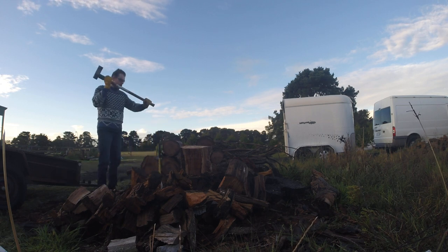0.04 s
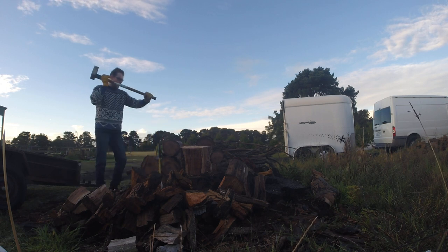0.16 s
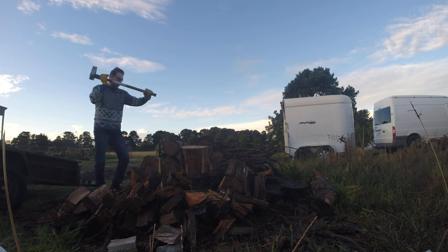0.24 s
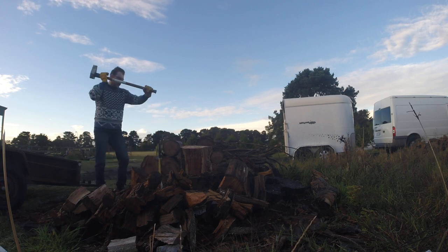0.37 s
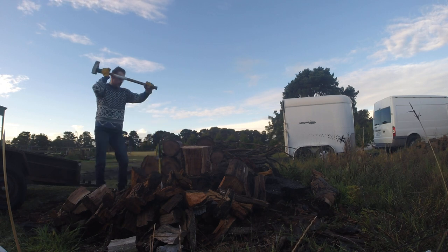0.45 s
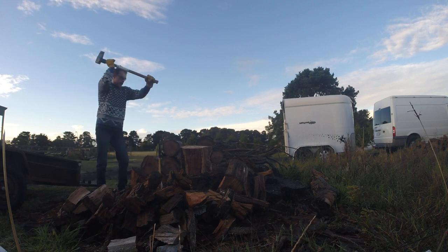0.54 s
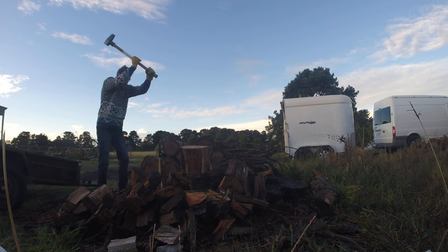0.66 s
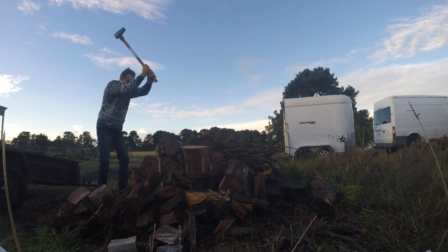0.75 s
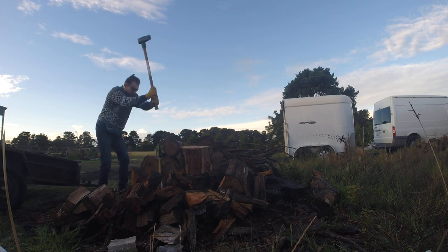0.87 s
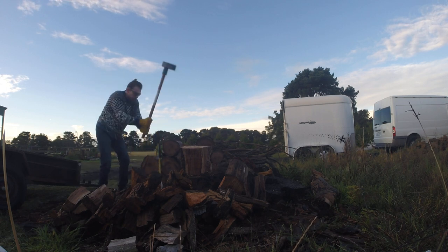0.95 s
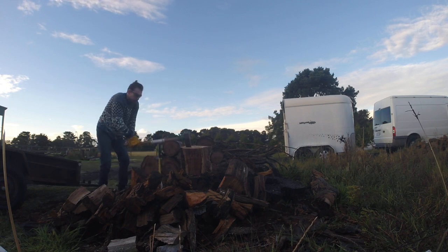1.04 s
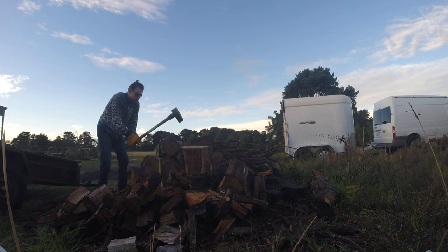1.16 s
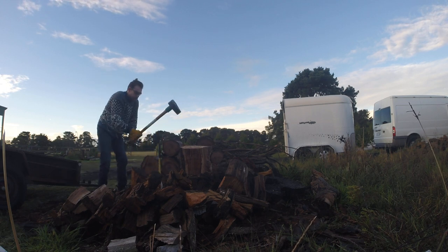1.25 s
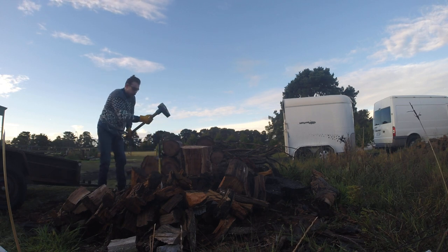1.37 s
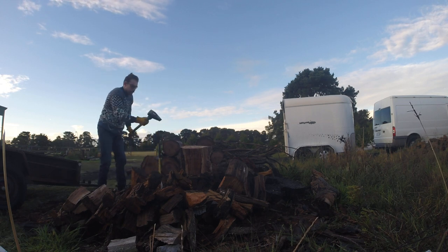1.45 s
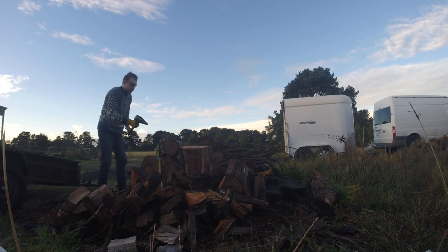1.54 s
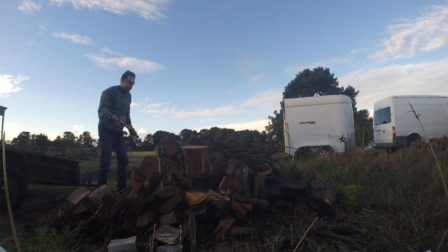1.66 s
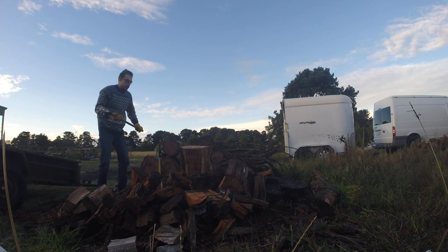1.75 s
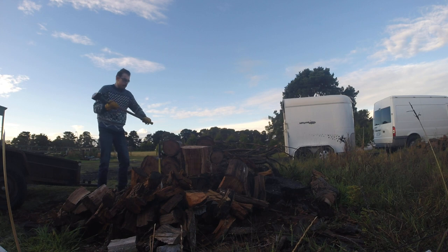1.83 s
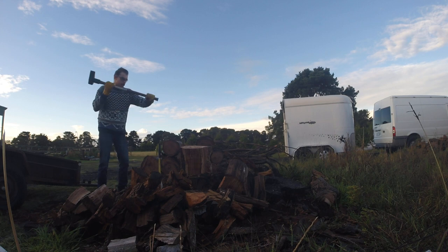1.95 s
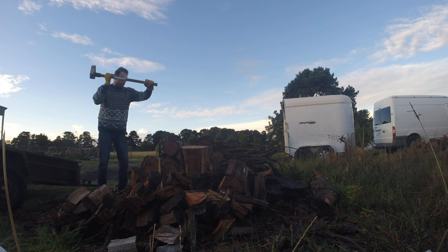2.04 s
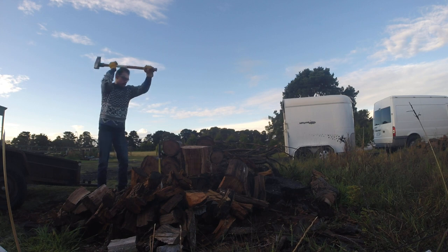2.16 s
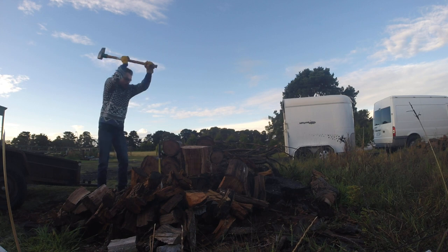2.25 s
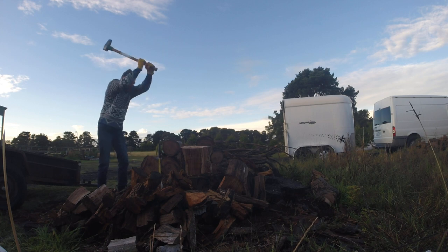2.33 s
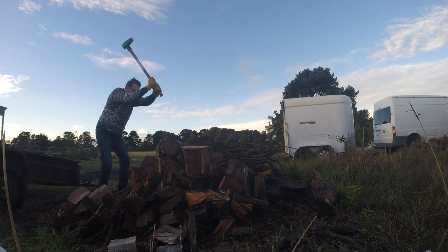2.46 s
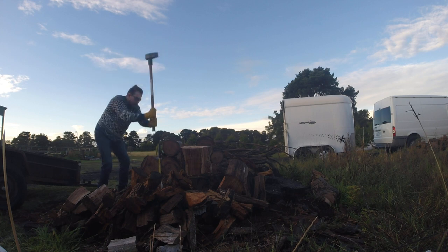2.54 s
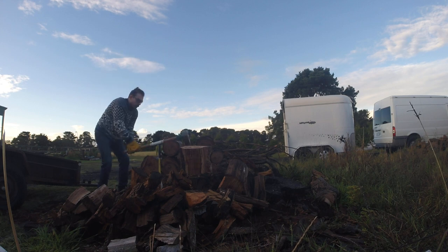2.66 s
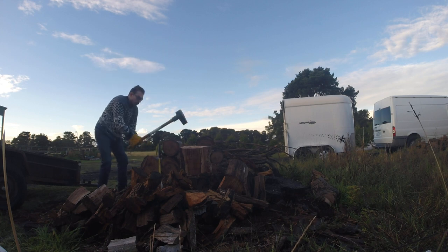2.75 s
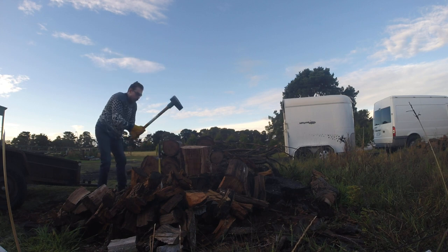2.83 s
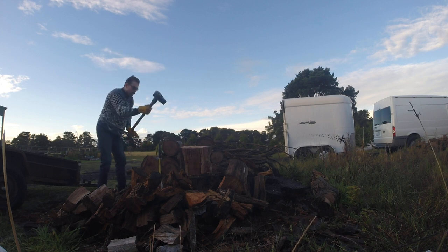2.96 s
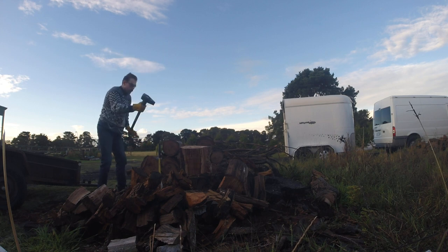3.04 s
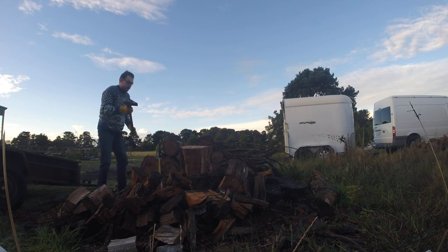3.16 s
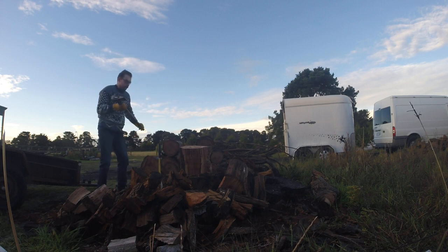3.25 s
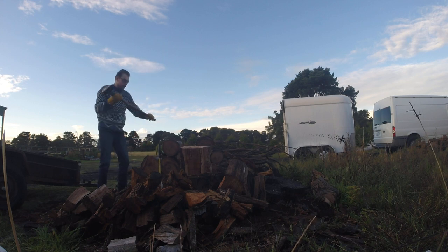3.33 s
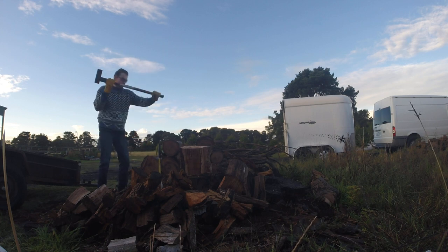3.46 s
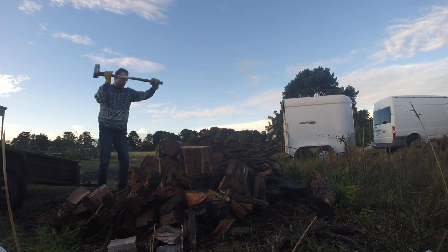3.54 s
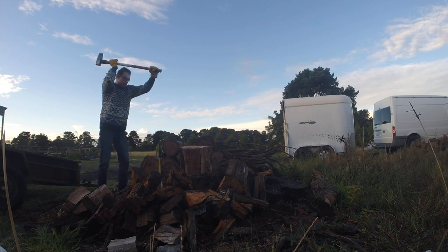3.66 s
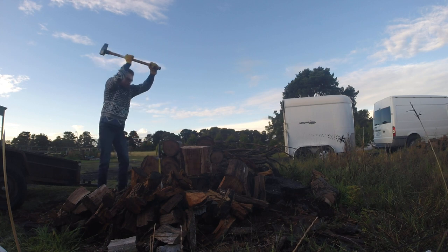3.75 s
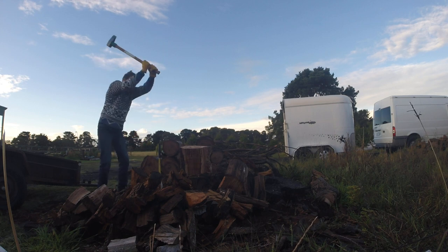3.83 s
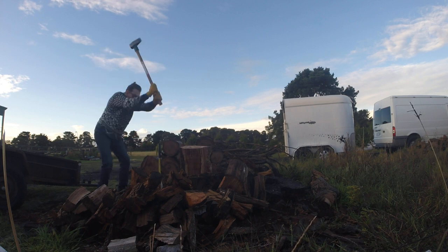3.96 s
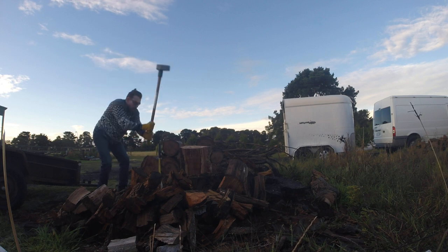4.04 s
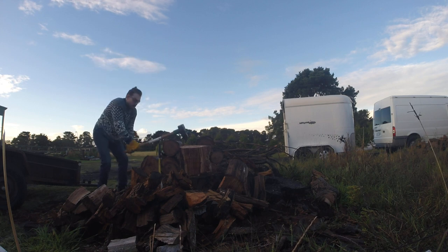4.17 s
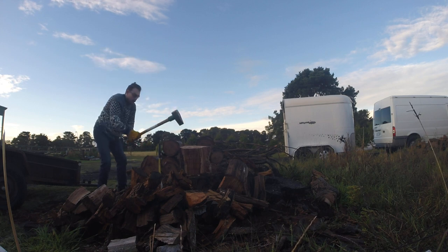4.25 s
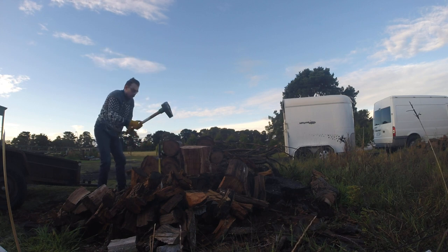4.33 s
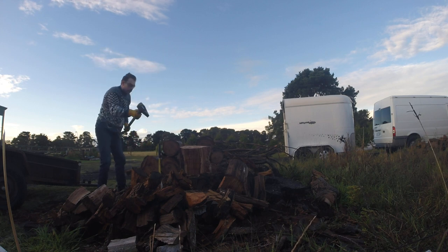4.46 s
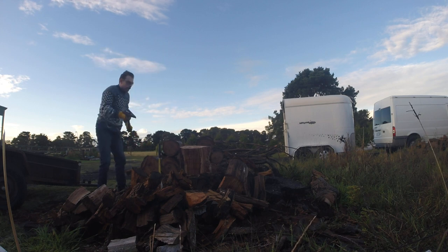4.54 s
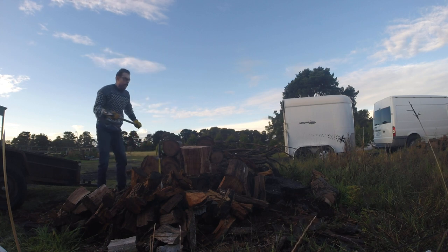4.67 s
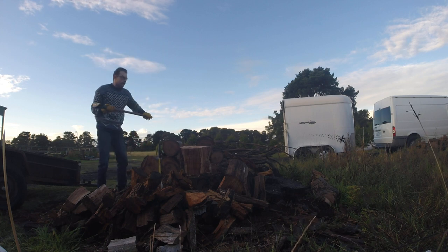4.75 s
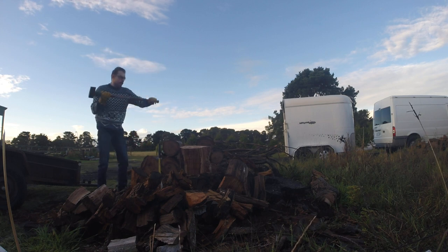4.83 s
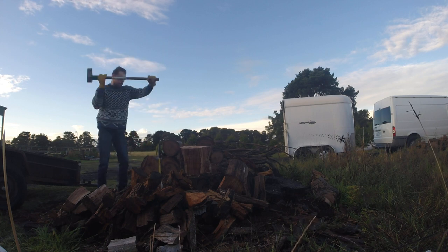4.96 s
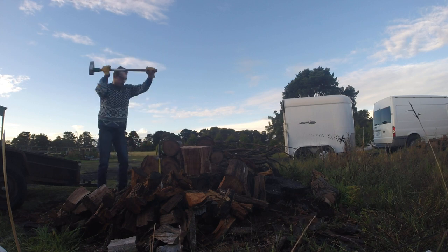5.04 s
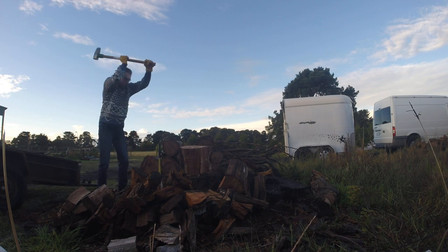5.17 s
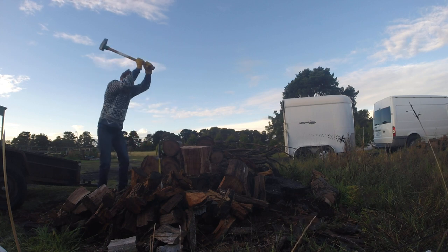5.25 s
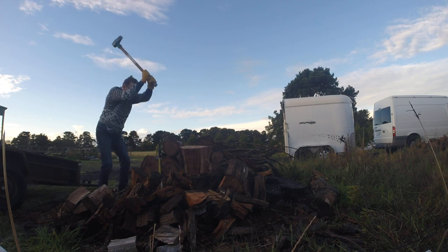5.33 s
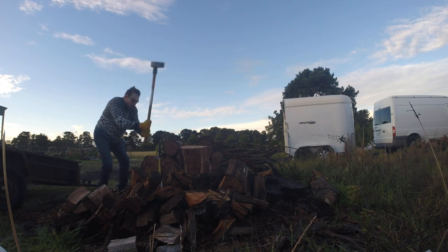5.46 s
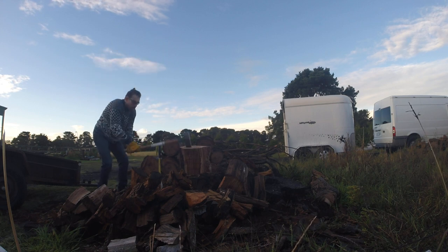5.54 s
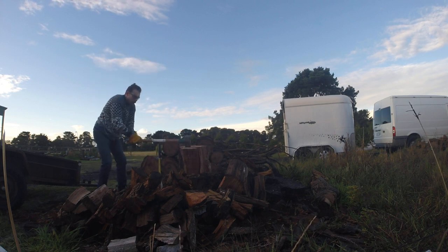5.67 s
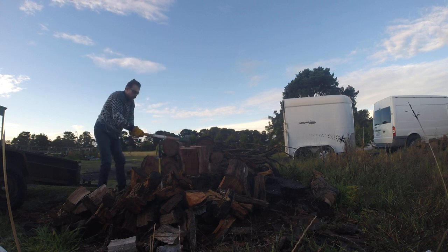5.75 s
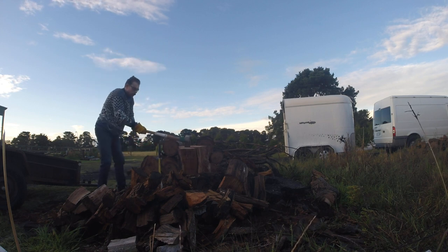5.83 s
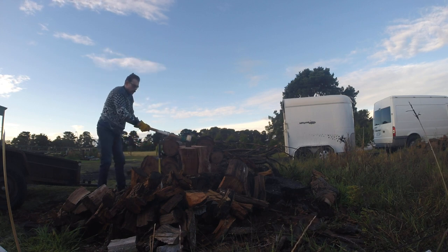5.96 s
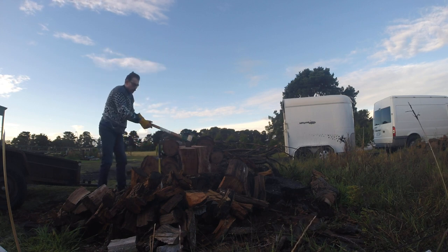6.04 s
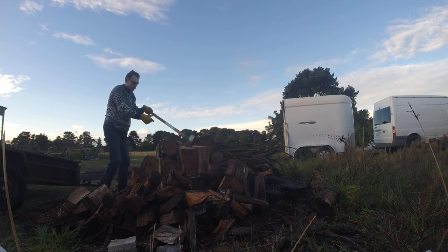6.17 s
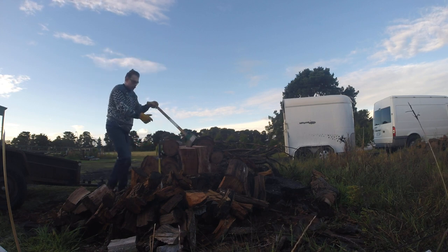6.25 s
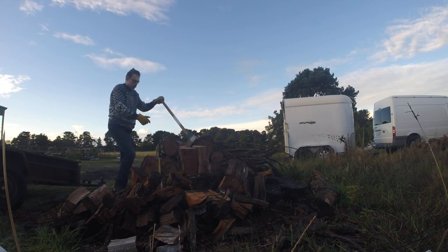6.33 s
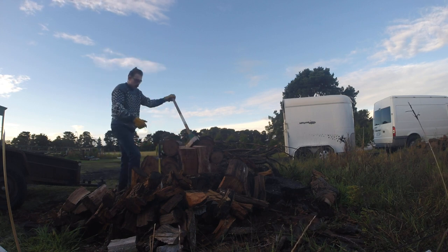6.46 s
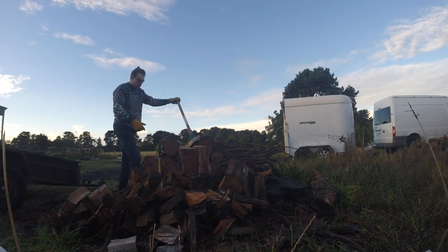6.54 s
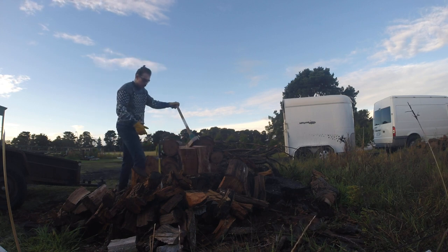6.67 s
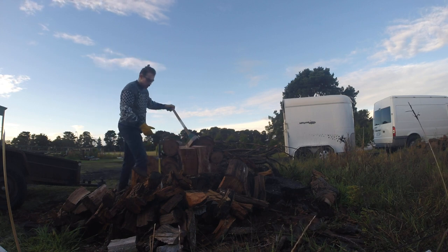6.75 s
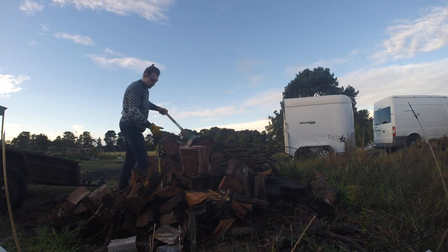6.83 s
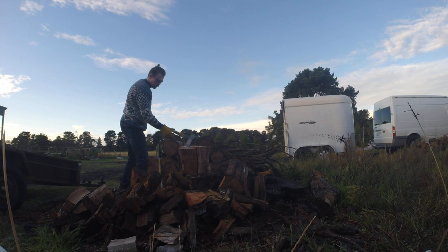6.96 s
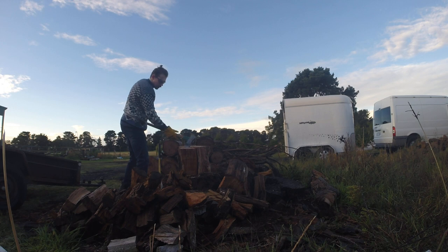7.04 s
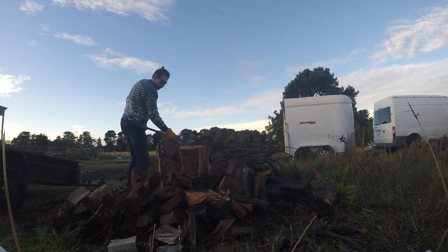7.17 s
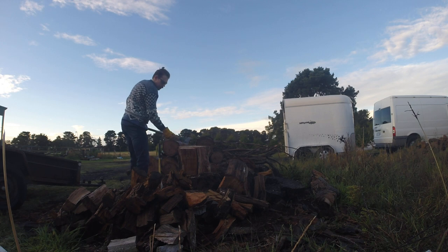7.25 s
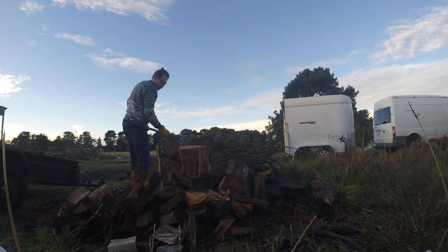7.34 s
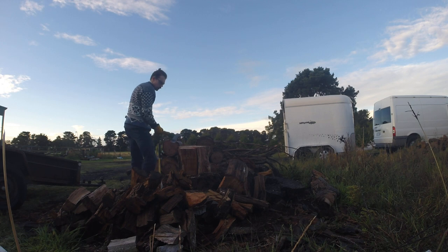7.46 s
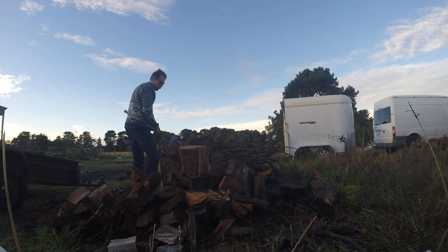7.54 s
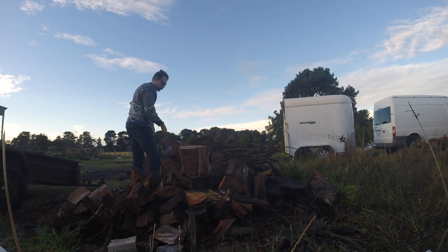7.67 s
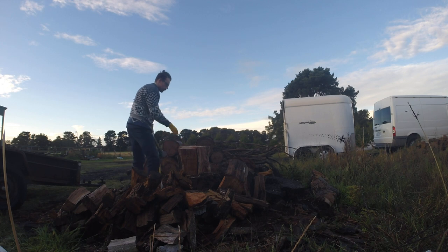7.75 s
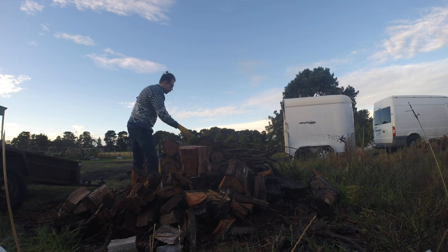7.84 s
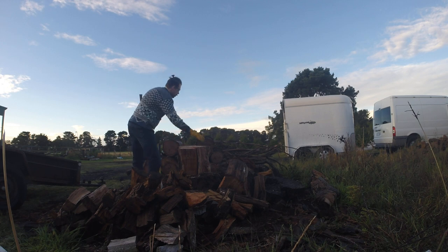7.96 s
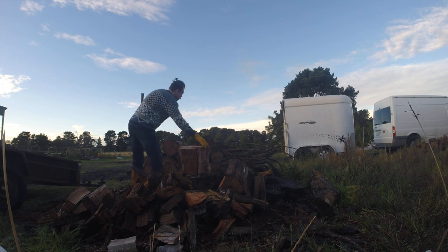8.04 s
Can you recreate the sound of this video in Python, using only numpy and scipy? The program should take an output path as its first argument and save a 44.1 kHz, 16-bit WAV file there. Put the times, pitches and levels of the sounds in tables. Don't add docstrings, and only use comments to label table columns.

```python
import sys
import numpy as np
from scipy import signal
from scipy.io import wavfile
from scipy.ndimage import uniform_filter1d

SR = 44100
rng = np.random.default_rng(int(sys.argv[2]) if len(sys.argv) > 2 else 0)


def natural_amplitude(level_db):
    exponent = np.asarray(level_db, float) / 20
    return 10 ** exponent


def inscribe(sig):
    pcm = np.round(np.clip(np.atleast_2d(sig).T, -1, 1) * 32767)
    wavfile.write(sys.argv[1], SR, pcm.astype(np.int16))


N = 357210


def rms_one(x):
    return x / np.sqrt(np.mean(x ** 2) + 1e-20)


def in_time(rows):
    s, *columns = np.transpose(rows)
    return [np.interp(np.arange(N) / SR, s, c) for c in columns]


def drift(rate):
    r = np.exp(-80 * np.pi * rate / SR)
    white = rng.standard_normal(N // 40 + 2002)
    slow = signal.lfilter([1], [1, -2 * r, r * r], white)[2000:]
    return np.interp(np.arange(N) / 40, np.arange(len(slow)), rms_one(slow))


def band(x, low_hz, high_hz):
    edges = [low_hz, min(high_hz, .45 * SR)]
    return signal.sosfilt(signal.butter(2, edges, "band", fs=SR, output="sos"), x)


def high_pass(x, hz):
    return signal.sosfilt(signal.butter(2, hz, "high", fs=SR, output="sos"), x)


def ring(clicks, hz, t60):
    r = natural_amplitude(-60 / (t60 * SR))
    w = 2 * np.pi * hz / SR
    return signal.lfilter([0, np.sin(w)], [1, -2 * r * np.cos(w), r * r], clicks + 1e-18)


def resonances(drive, rows):
    return sum(natural_amplitude(db) * rms_one(ring(drive, hz, np.log(1000) / np.pi / width)) for hz, width, db in rows)


def third_octaves(low_hz, count):
    edges = low_hz * 2 ** (np.arange(count + 1) / 3)
    return zip(edges, edges[1:], np.sqrt(edges[1:] * edges[:-1]))


def at_hz(points, hz, axis=1):
    return np.interp(np.log(hz), np.log(np.array(points)[:, 0]), np.array(points)[:, axis])


def coloured(spectrum, bands, patchy_db, pulse=0):
    out = 0
    white = rng.standard_normal((2, N))
    together = drift(0.28)
    for k, (low, high, hz) in enumerate(bands):
        flicker_db = patchy_db * min(1, 2500 / hz) * (.5 * together + drift(8.1))
        gain = natural_amplitude(at_hz(spectrum, hz) + flicker_db)
        out = out + gain * band(white[k % 2], low, high) * (1 + pulse * min(hz / 1200, 1.3))
    return rms_one(out)


def field_air():
    # frequency in Hz, density in dB per Hz.
    hiss = [(3000, 5.5), (5000, -0.8), (8000, -6.5), (11000, -9), (14800, -3), (15600, -34)]
    return natural_amplitude(-63.5) * coloured(hiss, third_octaves(2800, count=8), patchy_db=.3)


def tractor():
    # time in seconds, firings per second, exhaust level in dB, load from 0 to 1.
    engine = [(0, 57, -37, 0.5), (.7, 60.4, -40, 0), (1.45, 60, -42, .45), (1.75, 58.6, -38.5, 0.57),
              (2.15, 61, -40.5, 0.47), (3.05, 55.6, -40, 0.72), (3.9, 63.6, -43.5, .6),
              (4.08, 52, -43, 0.5), (4.2, 67, -51.5, 0.27), (4.74, 42, -54, 0.06), (4.815, 44, -51, .3),
              (4.84, 48.4, -43.5, 0.87), (5.16, 53.6, -38.5, 0.85), (5.65, 51.5, -37, 0.97),
              (5.9, 66, -55, .75), (6.2, 58, -41, 0.88), (6.9, 61.4, -40, 0.61), (8.1, 61, -41, .65)]
    # frequency in Hz, width in Hz, level in dB.
    pipe = [(354, 17, -25), (486.6, 29, -13.5)]
    # frequency in Hz, density in dB per Hz.
    roar_spectrum = [(25, 3), (42, 3), (75, 1.5), (120, -5), (260, -7.5), (400, -7), (490, -10),
                     (620, -6.5), (900, 3.5), (1250, -8), (1520, -9.5), (1750, -12), (2150, -11),
                     (3000, -30), (5000, -62)]
    # frequency in Hz, width in Hz, level in dB.
    valve_gear = [(2150, 340, 8.5), (3980, 64, -2.5), (4250, 270, 0.5)]
    # dB against the firing tone, dB gained for each dB it sinks.
    overtones = [(-25.5, 1.8), (-15.5, 0.83)]

    rate, hum_db, load = in_time(engine)
    swing_db = hum_db + 41
    roar_db = -43 + 0.18 * swing_db + 3 * load
    tick_db = -79.5 + 27.5 * load
    depth = 0.035 + 0.14 * load
    orders_db = [0] + [db - gain * swing_db for db, gain in overtones]
    turn = 2 * np.pi * np.cumsum(rate + .5 * drift(5.3)) / SR
    hum = 0
    for order, db in enumerate(orders_db, 1):
        hum = hum + natural_amplitude(db + 1.7 * drift(5.8)) * np.sqrt(2) * np.sin(order * turn)

    pulse = np.clip(depth, 0, .7) * (np.cos(turn) + 0.8 * np.cos(turn / 2))
    roar = coloured(roar_spectrum, third_octaves(22.7, count=25), patchy_db=2.0, pulse=pulse)
    breath = rng.standard_normal(N) * (1 + pulse)
    roar = roar + resonances(breath, pipe)

    puffs = rng.standard_normal(N) * np.exp(2.0 * np.cos(turn)) * natural_amplitude(2.5 * drift(30))
    tick = rms_one(resonances(puffs, valve_gear))
    return natural_amplitude(hum_db) * hum + natural_amplitude(roar_db) * roar + natural_amplitude(tick_db) * tick


def rustle():
    # centre in seconds, length in seconds, level in dB.
    rubs = [
        (0.725, .06, -62.5),
        (0.847, 0.049, -65),
        (2.455, .05, -67),
        (3.95, .05, -66),
        (5.385, .04, -69),
        (6.297, .006, -57),
        (6.316, 0.016, -58),
        (6.351, 0.0049, -60),
        (7.21, .04, -69),
    ]
    t = np.arange(N) / SR
    swell = sum(natural_amplitude(db) * np.exp(-.5 * ((t - s) / (length / 2)) ** 2) for s, length, db in rubs)
    grain = rng.standard_normal(N) * natural_amplitude(1.9 * drift(120))
    return swell * rms_one(band(grain, 2900, 8200))


def contacts():
    # start in seconds, pitch factor of the round, split from 0 to 1,
    # thud into the stump in dB, steel ring as the head stops in dB.
    swings = [
        (1.1854, 1.13, 0.16, -18.5, -20),
        (2.7971, 1.14, 0, -12, -12.5),
        (4.2642, 1.182, 0.32, -17.5, -14),
        (5.6899, 0.81, 0.92, -27, -14),
    ]
    # level in dB in whole wood, dB change when split,
    # tilt in dB per octave, tilt change when split.
    bite_rule = [(-17, 6, -8, 12.5), (-5, -4, 4, 6)]
    stop_rule = [(-19, 11.5, -7, 3.6), (-8, -2, -5, 7.5)]
    # start in seconds, pitch factor, thud in dB, body in dB, handle in dB.
    bumps = [
        (2.869, 0.96, -23, -30, -20),
        (2.876, .8, -25.5, -19.5, -30),
        (5.738, 1.05, -33, -41, -34),
        (6.662, 0.79, -41, -53, -60),
        (6.639, 0.98, -31.5, -61, -60),
        (7.258, 1.215, -33.5, -21.5, -32),
        (7.821, .8, -41.5, -55, -60),
    ]
    # start in seconds, pitch factor, body, handle and steel in dB.
    taps = [
        (7.1515, 1.13, -52, -38, -43),
        (7.1548, 1.032, -44, -23.5, -26.5),
        (7.1572, 1.13, -51, -24, -29),
    ]

    silent = (-80, 0)
    handle_tilt = 6.9
    rows = []
    for s, pitch, split, thud_db, steel_db in swings:
        bite_db = -22.5 - 35 * split
        bite_wood, stop_wood = [
            [(db + split * more_db, tilt + split * more_tilt) for db, more_db, tilt, more_tilt in rule]
            for rule in (bite_rule, stop_rule)]
        rows.append((s, pitch, 0.73 - 0.44 * split / 2, bite_db - 5.5,
                     [(thud_db, 6.2), *bite_wood, (bite_db, 0)]))
        handle = (-8.5 - 10 * split, handle_tilt)
        rows.append((s + 0.002093, pitch ** 0.12, 0.81 - 0.44 * split, steel_db - 5.5,
                     [(thud_db, -1.8), *stop_wood, (steel_db, 0), handle]))
    for s, pitch, thud_db, body_db, handle_db in bumps:
        thud = (thud_db, -16.5 * (pitch - 1))
        rows.append((s, pitch, 0.6, silent[0],
                     [thud, (body_db, -1), silent, silent, (handle_db, handle_tilt)]))
    for s, pitch, body_db, handle_db, steel_db in taps:
        rows.append((s, pitch, 0.77, steel_db - 8.5,
                     [silent, (body_db, 4), silent, (steel_db, 0), (handle_db, -2)]))
    return rows


def fibre_snap(length):
    t = np.arange(length) / SR
    envelope = .5 * t / 0.00014 * np.exp(-t / 0.00035) + 0.22 * np.exp(-t / 0.0057)
    grit = rng.standard_normal(length) * envelope
    grit[int(.0006 * SR)] += 1.5
    return signal.lfilter(*signal.butter(1, 2960, fs=SR), band(grit, 1200, 11900))


def axe():
    # frequency in Hz, level in dB, decay time t60 in seconds.
    thud = [(41.7, 1, 0.15), (91, 0, 0.38), (140.8, -4.5, 0.36), (176, 11.5, 0.04), (229.1, 12.5, 0.19)]
    body = [(320, 0.5, 0.064), (362, -0.5, 0.021), (441, 18.5, 0.0082), (624, 15, 0.021)]
    knock = [(756, -2, 0.0097), (812, 5, 0.022), (992, 9.5, 0.026), (1282, 9, 0.017), (1350, 6, 0.012)]
    head = [(2080, 9, 0.023), (2580, 10, 0.017), (3220, 6.5, 0.03)]
    handle = [(544, -5.5, 0.05), (1365, -8, .025), (957, 4.5, 0.034)]
    push_s = [0.001, 0.00025, 0.00012, 0.000092]

    groups = (thud, body, knock, head, handle)
    pushes = [*push_s, .00015]
    out = np.zeros(N + SR)
    length = SR // 3
    t = np.arange(length) / SR
    for s, pitch, free, snap_db, levels in contacts():
        blow = np.zeros(length)
        for g, (modes, (level_db, tilt), contact) in enumerate(zip(groups, levels, pushes)):
            push = t * np.exp(-t / contact)
            shift = pitch if g in (1, 2) else 1
            for j, (hz, db, t60) in enumerate(modes):
                sign = (-1) ** (j + (g == 2))
                height = natural_amplitude(level_db + db + tilt * np.log2(hz / modes[2][0]))
                blow += sign * height * ring(push / push.sum(), hz * shift, t60 * free)
        start = int(s * SR)
        out[start:start + length] += blow + natural_amplitude(snap_db + 20) * fibre_snap(length)
    return high_pass(out[:N], 55)


def field(x):
    # delay in seconds, level in dB, low cut in Hz, high cut in Hz, smear in seconds.
    echoes = [(.0075, -10, 300, 3900, 0.0012), (0.014, -11, 4540, 17000, 0.000018),
              (0.012, -8, 5100, 5500, 0.0014), (.0210, -13, 133, 3400, 0.000013),
              (0.021, -9.5, 1760, 25000, 0.0017), (0.02, -20, 830, 11000, 0.011),
              (0.0419, -24.5, 60, 2000, 0.00079), (0.046, -36, 380, 4000, 0.009),
              (0.06, -18.5, 2740, 10000, 0.014), (0.114, -27.5, 2200, 7100, 0.024),
              (0.3, -30, 5700, 19000, 0.021), (.051, -33, 510, 1700, 0.00028),
              (0.12, -25, 440, 4800, 0.00064), (0.099, -39, 880, 3000, 0.00042),
              (.167, -32, 1200, 2600, 0.0014), (0.029, -18, 4500, 14000, .003)]
    # frequency in Hz, level in dB, decay time t60 in seconds.
    scatter = [(100, -18, 0.76), (250, -7, 0.41), (500, -34, .2), (1010, -21, 0.42), (2930, -7.5, 0.25),
               (7560, -8, 0.15), (13000, -23, 0.22)]

    t = np.arange(SR) / SR
    direct = 1. * (t == 0)
    shadow = 0.71
    response = (1 - shadow) * direct + shadow * signal.lfilter(*signal.butter(1, 4970, fs=SR), direct)
    for delay, db, low_hz, high_hz, smear in echoes:
        rough = smear / (smear + 0.000098)
        age = np.maximum(t - delay, 0) / smear
        cluster = (1 - rough + rough * rng.standard_normal(SR)) * age * np.exp(-age)
        response += natural_amplitude(db) * band(cluster / np.sqrt(np.sum(cluster ** 2)), low_hz, high_hz)
    white = rng.standard_normal((2, SR)) / np.sqrt(0.021 * SR)
    for k, (low, high, hz) in enumerate(third_octaves(39.5, count=26)):
        decay_db = at_hz(scatter, hz) - 60 * t / at_hz(scatter, hz, axis=2)
        fade = natural_amplitude(decay_db) * np.minimum(t / 0.0014, 1)
        response += band(white[k % 2], low, high) * fade
    return signal.fftconvolve(x, response)[:N]


def scene():
    return (field(axe()) + tractor() + field_air() + rustle())[None]


def whine():
    frames = np.arange(N) / SR * 24000 / 1001
    phase = frames % 1
    gate = uniform_filter1d(1. * (phase > .055) * (phase < .53), size=40)
    step = natural_amplitude(-2.0 * (phase > .26))
    return natural_amplitude(-68.5) * gate * step * np.cos(2 * np.pi * 445 * frames)


def ducking():
    # start in seconds, depth in dB.
    ducks = [
        (1.25, 5),
        (2.85, -1.5),
        (4.36, 7),
        (5.72, 10.5),
    ]
    sink_db_per_s, recover_db_per_s = 34, 15
    t = np.arange(N) / SR
    total_db = 0
    for s, db in ducks:
        sunk = db / sink_db_per_s
        total_db = total_db + np.interp(t - s, [0, sunk, sunk + db / recover_db_per_s], [0, db, 0])
    return -total_db


def low_pass(x):
    return signal.sosfilt(signal.butter(12, 16270, fs=SR, output="sos"), x)


def record(dry):
    capsule = signal.sosfilt(signal.butter(2, [32, 9440], "band", fs=SR, output="sos"), dry)
    x = np.clip((capsule + whine()) * natural_amplitude(ducking()), -.99, .99)
    mix = signal.sosfilt(signal.cheby2(12, 60, 17600, fs=SR, output="sos"), x)
    return low_pass(mix)


dry = scene()
out = record(dry)
inscribe(out)
```